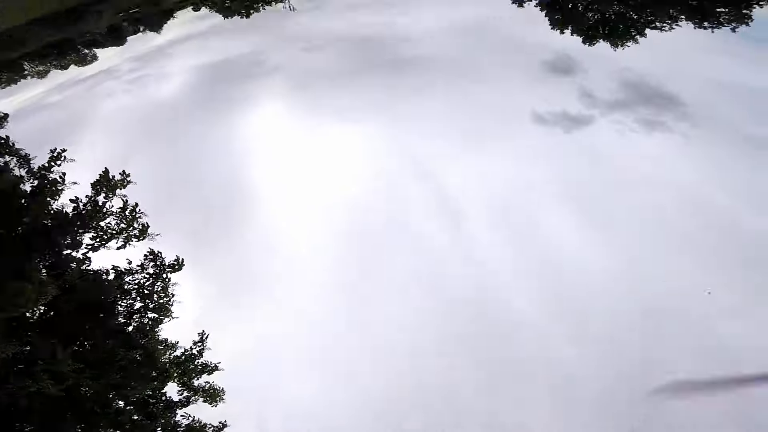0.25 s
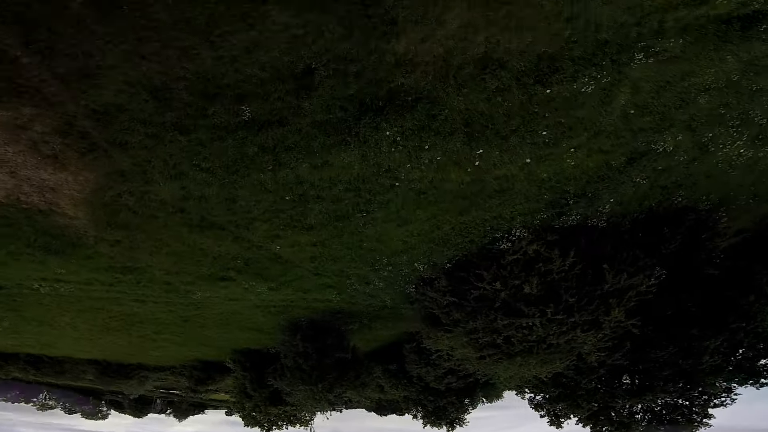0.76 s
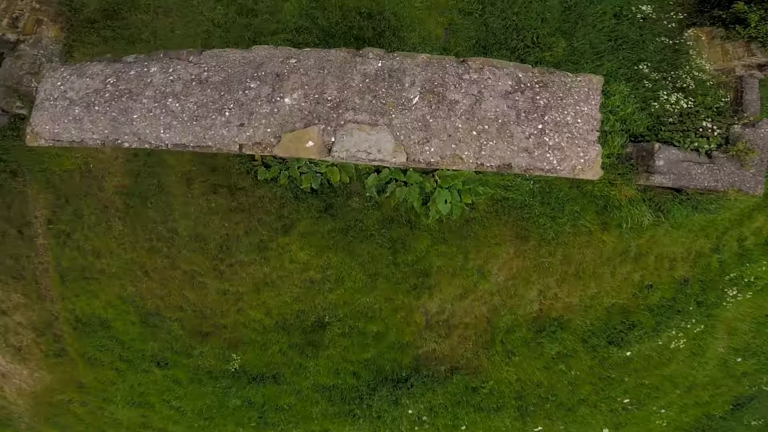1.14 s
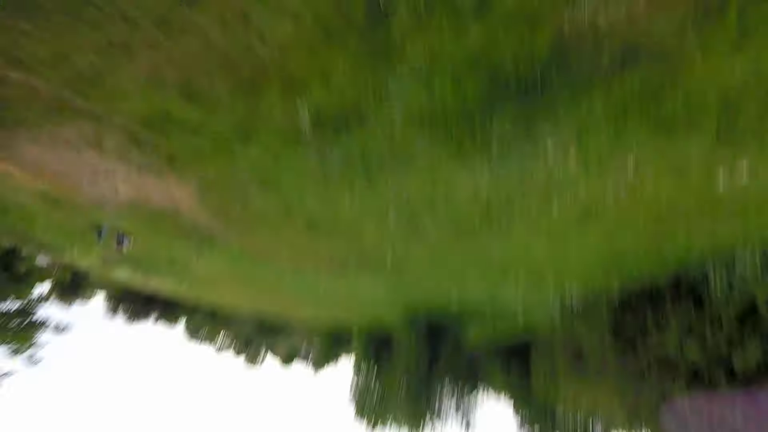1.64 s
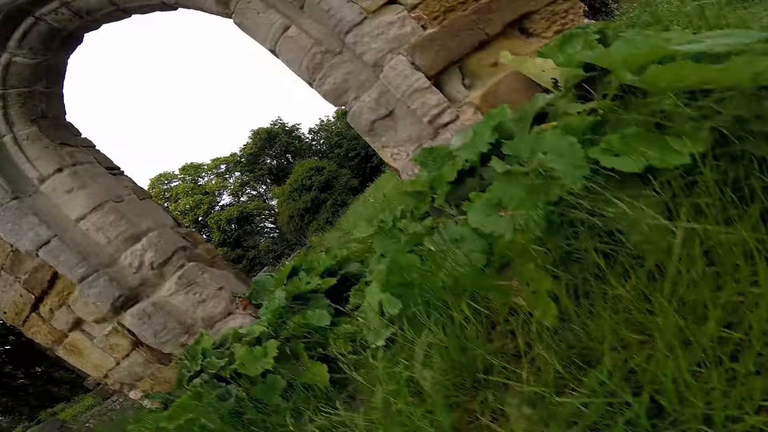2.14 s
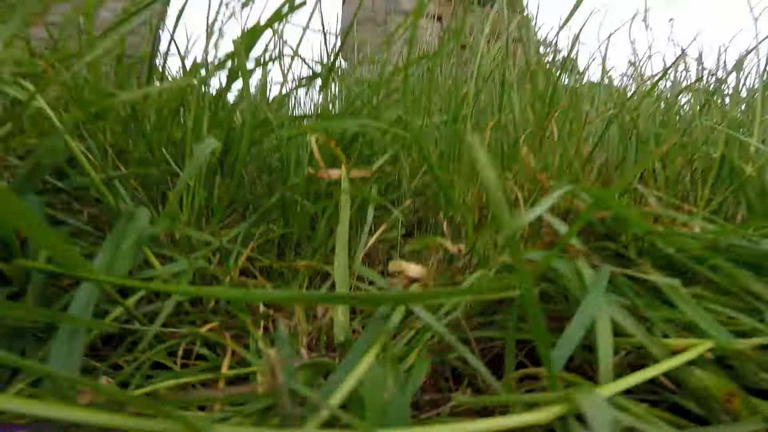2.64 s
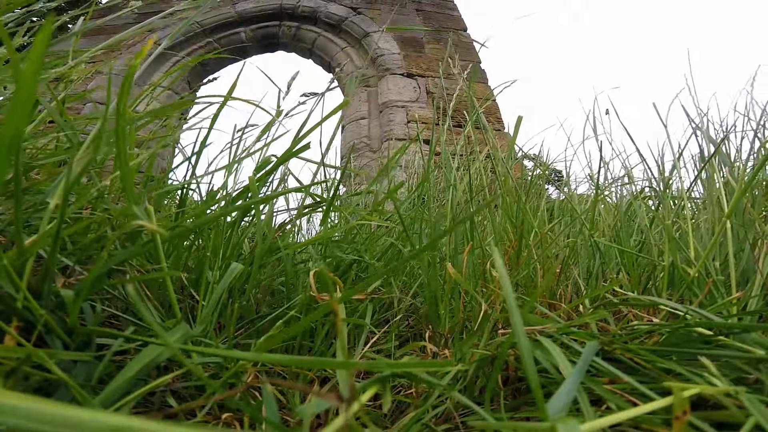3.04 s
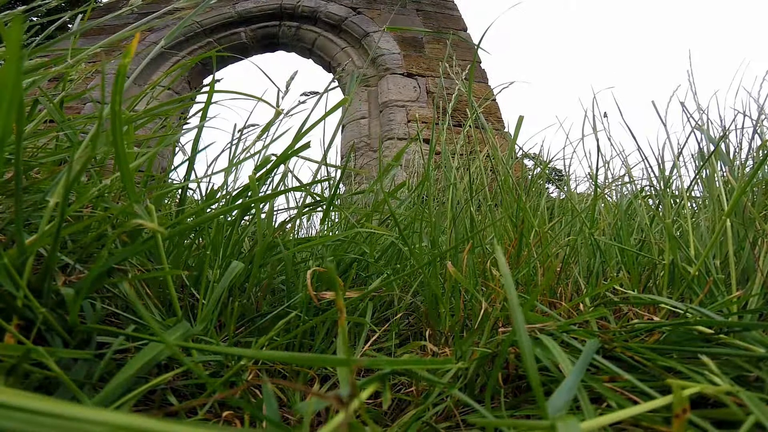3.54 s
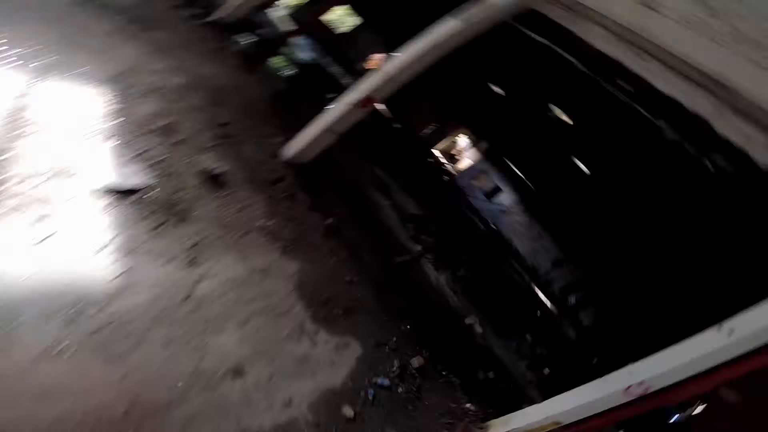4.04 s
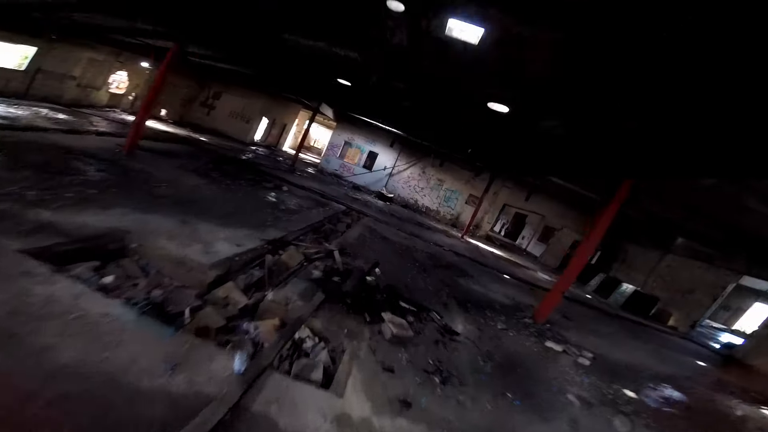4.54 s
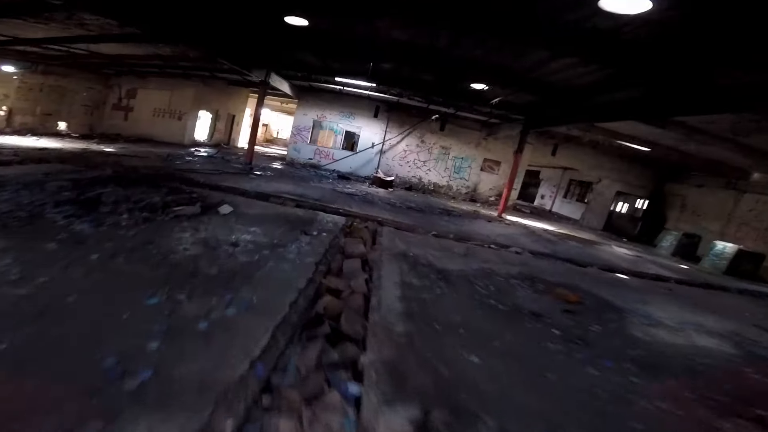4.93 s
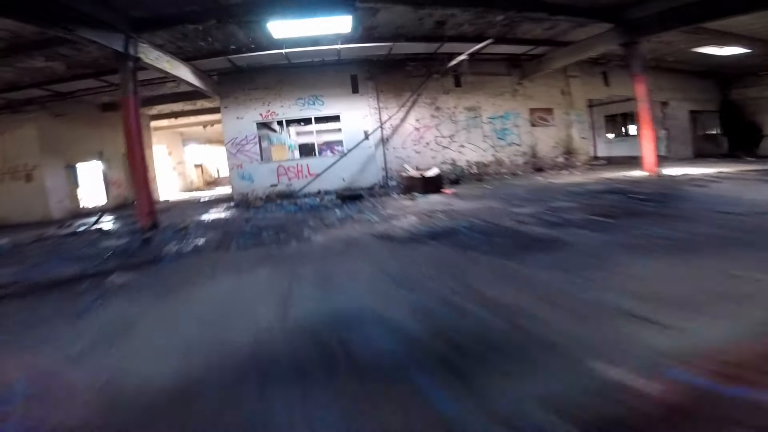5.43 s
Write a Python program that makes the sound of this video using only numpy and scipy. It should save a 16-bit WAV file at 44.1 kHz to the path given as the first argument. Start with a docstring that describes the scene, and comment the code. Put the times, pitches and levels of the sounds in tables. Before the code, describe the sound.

The microphone rides on a small racing quadcopter, so everything is close and raw. From 0 s a rough low propeller drone flutters with wind rumble, surging around 0.75 s, easing, then swelling again to 1.2 s with hissing prop wash. At about 1.4 s it hits a stone wall: hard thuds, a crack, short blade scrapes. The motors sag to a quieter churn, a small crack and sharp rev come at 1.65-1.8 s, then the pitch falls. At 2.2-2.4 s blades thrash into grass with dull knocks and choppy swish; the motors cut off, leaving faint ticks and near silence. At 3.61 s an abrupt cut starts an indoor flight: jabbing throttle bursts until 4 s, then a brighter buzzing cruise, its detuned motors beating and swaying, stepping up by 4.5 s, dipping near 5 s and climbing to the end, with shaft hum, buffeting and a short concrete echo.

```python
"""A rough propeller drone comes first: a racing quadcopter dives outdoors, heard from the camera on its frame.
It clips a stone wall, revs and tumbles into long grass; an abrupt cut then leads to a cruise in a concrete hall.
Sums of sines make the blade drone, the once-a-turn hum and the motor whine; all follow the motor speeds.
Shaped noise makes the hissing prop wash, buffeting air, scrapes and grass; struck resonances make the knocks."""
import sys
import numpy as np
from scipy import signal
from scipy.fft import rfft, irfft, next_fast_len
from scipy.io import wavfile
from scipy.ndimage import uniform_filter1d, minimum_filter1d

SR = 44100
rng = np.random.default_rng(int(sys.argv[2]) if len(sys.argv) > 2 else 0)


def transcribe(signal):
    """Save signal, clipped to [-1, 1], as a 16-bit WAV file at the path in sys.argv[1]."""
    frames = np.atleast_2d(signal).T
    limited = np.clip(frames, -1, 1)
    pcm = np.round(limited * 32767).astype(np.int16)
    wavfile.write(sys.argv[1], SR, pcm)


N = 250488
TIME = np.arange(N) / SR
CUT_S = 3.61  # from outdoors to the hall

# Throttle, as the rate at which blades pass: time_s, blade_rate_hz
FIELD_THROTTLE = [(0, 134.3), (.39, 119.7), (.47, 138.1), (.577, 186), (.736, 349.6), (.897, 241.2),
                  (1.0, 246.8), (1.21, 369.5), (1.384, 227.8), (1.5, 74.1), (1.666, 105.2), (1.811, 446.7),
                  (2.1, 121), (2.55, 99.76)]
HALL_THROTTLE = [(3.735, 430), (3.84, 340), (4, 325), (4.12, 345), (4.26, 442), (4.35, 432), (4.47, 569),
                 (4.535, 577), (4.71, 492), (4.8, 531), (4.89, 540), (4.98, 452), (5.04, 432), (5.12, 462),
                 (5.29, 600), (5.46, 613), (5.55, 652), (5.68, 608)]
# Outdoor speed compared with the throttle: motor_a_ratio, motor_b_ratio, motor_c_ratio
FIELD_TRIM = (0.93, 1.06, 0.97)
# Steering in the hall: time_s, b_to_a_ratio, c_to_a_ratio
HALL_STEERING = [(4, 1.17, 1), (4.33, 1.28, 1.14), (4.48, 1.19, 1.02), (4.7, 1.155, 1.13),
                 (4.92, 1.15, 1.13), (5.2, 1.12, 1.01), (5.34, 1.145, .92)]
# Stick jabs, with the blade rate each motor chases: start_s, length_s, push_a_hz, push_b_hz, push_c_hz
FIELD_JABS = [(-.097, 0.11, 331, 449.5, 340.5), (0.047, 0.065, -29, 40, 36),
              (0.111, .037, 61.5, -22.5, 5.5), (0.174, 0.054, 2, 19.5, -3.5),
              (0.264, 0.036, 62.5, -5.5, 29), (0.436, 0.037, 25, 86, 71), (0.48, .1, -51.5, 95.5, 20),
              (0.66, 0.27, 44, 120, 112.5), (1.171, .06, 199, 120, 148), (1.229, .05, 59, 260.5, 190),
              (1.291, .033, 900, 664, 536), (1.36, 0.032, 564.5, 779.5, 564.5),
              (1.422, 0.052, 206, 461, 378), (1.645, 0.081, 262.5, 760, 464),
              (1.694, .103, 954.5, 199, 643.5), (2.191, 0.092, 184, 305.5, 66),
              (2.283, 0.074, 403.5, 563, 339)]
HALL_JABS = [(3.577, .16, 395, 415.5, 370), (3.764, .026, 920, 852, 680), (3.802, .035, -1, 170.7, 19),
             (3.866, .038, 0, 329.2, 21), (3.939, .067, 0, 371, -0.5), (4, 0.036, 479.5, 260, 480)]
# Time constants with which motors chase a jab and lose it again
FIELD_SPIN_UP_S, FIELD_SPIN_DOWN_S = 0.0515, 0.0416
HALL_SPIN_UP_S, HALL_SPIN_DOWN_S = 0.022, 0.028
HOVER_HZ = 400  # blade rate
FULL_LOAD_OCTAVES_PER_S = 15  # a spin-up that draws the full current

# Balance of the four motors: blade_tone_db, imbalance_db, overtones_db, whine_db
FIELD_MOTORS = [(-1, -18, 1.5, 5), (-0.5, -19.5, -9, 0.5), (-8.5, -22, -10, 1), (-15.5, -23, -1.5, -2)]
HALL_MOTORS = [(1, -16, 7, -1), (-4.5, 0, 0, -3), (-3, -11, -4, 1), (-16, -20, 0, -6)]
# Blade tones: multiple_of_shaft_rate, relative_level_db
FIELD_ORDERS = [(2, -20.5), (3, 0), (4, -22.5), (5, -32), (6, -9), (9, -32.5), (12, -31), (15, -36.5),
                (18, -28), (21, -33.5)]
HALL_ORDERS = [(2, -33.5), (3, 4), (4, -19), (5, -15.5), (6, -14), (7, -41.5), (8, -31), (9, -27.5),
               (12, -33.5), (15, -36), (18, -39.5), (21, -50), (24, -46)]

# How each layer follows the motors: level_at_hover_db, change_per_octave_db, added_at_full_load_db
FIELD_DRONE_LAW = (-18.5, 3.5, 0.78)
FIELD_WASH_LAW = (-35.5, 12.6, 0.97)
FIELD_WHINE_LAW = (-51, 0.91, 8.6)
FIELD_WIND_LAW = (-20, 5, 1)
HALL_DRONE_LAW = (-25.5, 5.47, 1)
HALL_WASH_LAW = (-45.5, 10.04, 5)
HALL_WHINE_LAW = (-67, -11.5, 30)
WASH_TOP_OCTAVES = 0.49  # outdoors, speed above this adds no more wash

# Shaft hum in the hall: time_s, relative_level_db
HALL_HUM = [(3.62, -8.5), (3.98, -11.5), (4.13, -23), (4.26, -6.5), (4.45, -4.5), (4.48, -28.5), (4.5, -8),
            (4.58, -12.5), (4.81, -0.5), (5.01, -13), (5.12, -7.5), (5.19, -9), (5.21, -7.5), (5.68, -11)]
# Boom of the camera mount, and boost of the once-a-turn shaking outdoors
MOUNT_HZ, MOUNT_WIDTH_HZ, MOUNT_DB, SHAKE_DB = 204, 24, 8.5, 10
# Ring of the camera case
CASE_HZ, CASE_WIDTH_HZ, CASE_DB = 7700, 270, 13.5
# Slow blades turn this share of their drone power to noise; it shrinks as speed rises
IDLE_HZ, IDLE_CHURN, CHURN_CLEARS_HZ = 110, 0.27, 160
# Motors switched off in the grass
DISARM_S, DISARM_DB_PER_S = 2.414, 81

# Noise colours of bearings, prop wash and churning blades: pitch_hz, relative_level_db
BEARINGS = [(5000, -31), (6900, -16.5), (7250, 9), (7600, 16.5), (8000, -17.5), (10000, -36.5)]
FIELD_WASH = [(100, 5), (500, 16), (1200, 9), (2000, 6.5), (3200, -0.5), (4500, -4), (6000, -6.5),
              (7500, -6), (9000, -13), (11000, -24.5), (12500, -35.5), (15000, -40.5)]
HALL_WASH = [(100, 8.5), (600, 26), (1200, 15), (2000, 8), (3200, 2.5), (4800, -2.5), (6500, 1.5),
             (7800, -1), (9000, -17.5), (11000, -31.5), (14000, -43)]
CHURN = [(80, -9.5), (220, 8), (400, 4.5), (620, 4.5), (850, -5), (1300, -8.5), (2200, -29), (6000, -59.5)]

# Knocks on the frame, the one at 1.649 s a jolt as the motors restart: time_s, thud_relative_db, crack_db
KNOCKS = [(1.399, -8, -13), (1.419, -9, -39), (1.466, -31, -15), (1.649, -31, -26), (2.197, -14.5, -58),
          (2.262, 3, -22), (2.285, 0, -17), (2.359, -39, -23), (2.629, -36.5, -65), (2.714, -46, -71)]
# Ringing tones of the frame: pitch_hz, relative_level_db, time_to_fall_60_db_s
FRAME = [(75.6, 12, 0.057), (158, -0.5, 0.26), (261.6, -10, 0.054), (600, -5.5, 0.029), (1250, -8.5, 0.037)]
# Blades scraping the wall: start_s, length_s, level_db
SCRAPES = [(1.366, .036, -11), (1.432, 0.05, -18.5)]
# Blades in the grass, then settling stalks: start_s, length_s, swish_db, churn_db
GRASS_HITS = [(2.194, 0.049, -58.5, -35), (2.251, 0.12, -46, -19.5), (2.628, 0.158, -82, -64),
              (2.778, .055, -92, -72), (2.871, .055, -98, -72)]
# Noise colour of the grass: pitch_hz, relative_level_db
GRASS = [(500, -4), (2500, 0.5), (4200, -5), (6200, 11), (8000, 5), (10800, 5.5), (12000, -13),
         (14500, -15)]
# Time constants of a scrape or grass contact
CONTACT_ATTACK_S, CONTACT_RELEASE_S = 0.011, 0.0035

# Overall loudness outdoors, for the motors and partly the wind: time_s, level_db
FIELD_LOUDNESS = [(0, -4.5), (.4, -3.5), (.5, 1), (.75, 3), (1.05, 3), (1.2, 5), (1.4, 0.5), (1.52, -18),
                  (1.75, -8.5), (1.9, -19.5), (2.19, -14), (2.22, -10), (2.28, 1), (2.37, -12.5),
                  (2.58, -43), (2.68, -34), (2.85, -60), (3.1, -78), (3.55, -49)]
WIND_FOLLOWS = 0.62  # share of the loudness's dB swing applied to the wind
# Air buffeting the microphone in the hall: time_s, relative_level_db
HALL_BUFFET = [(3.62, -15), (3.87, -14.5), (3.94, -14.5), (4.04, -10.5), (4.07, -17.5), (4.19, -12.5),
               (4.2, -17), (4.46, -21.5), (4.48, -16), (4.97, -16), (5.29, -12.5), (5.68, -14)]
# Noise colours of buffeting and of still air: pitch_hz, relative_level_db
FIELD_WIND = [(20, -3.5), (45, 3), (90, 7), (140, 4.5), (220, -1.5), (400, -28.5), (800, -21.5),
              (1300, -35.5), (2200, -48), (6000, -69.5)]
HALL_WIND = [(20, -4), (40, 4), (80, 3.5), (150, 2.5), (260, -7), (420, -15), (800, -21.5), (2000, -35),
             (6000, -88)]
STILL_AIR = [(30, 32), (150, 25), (600, 19), (1500, 6.5), (4000, -1), (6500, 2), (9000, 2.5), (11000, -7.5),
             (15000, -18)]
STILL_AIR_DB = -88.5
HALL_T60, HALL_DB = 0.23, -23  # echo: seconds to fall 60 dB, and level


def motor_speeds(throttle, trims, jabs, up_s, down_s):
    """Blade rates of three motors: trimmed throttle plus jabs, which they chase and lose with a lag."""
    throttle_hz = in_time(throttle)[0]
    speeds = [trim * throttle_hz for trim in trims]
    for start, length, *pushes in jabs:
        response = swell(start, length, up_s, down_s)
        speeds = [hz + push * response for hz, push in zip(speeds, pushes)]
    return np.maximum(speeds, 30)


def shafts(speeds, hunting):
    """Blade rates and shaft angles of four motors; the fourth averages A and B, and all waver a little."""
    a, b, c = speeds
    rates, angles = [], []
    for hz in (a, b, c, (a + b) / 2):
        rate = uniform_filter1d(hz, size=600) * (1 + hunting * drift(30))
        turns = np.cumsum(rate) / (3 * SR)  # three blades pass in each turn
        rates.append(rate)
        angles.append(2 * np.pi * (turns + rng.random()))
    return rates, angles


def effort(speeds):
    """Typical speed in octaves above hover, and load: near 1 in a hard spin-up, negative when slowing."""
    octaves = uniform_filter1d(np.log2(np.median(speeds, axis=0) / HOVER_HZ), size=400)
    octaves_per_s = np.gradient(octaves) * SR
    load = np.tanh(octaves_per_s / FULL_LOAD_OCTAVES_PER_S)
    return octaves, np.maximum(load, -0.5)


def level_db(law, octaves, load):
    """A layer grows or fades with motor speed and load."""
    hover_db, octave_db, load_db = law
    return hover_db + octave_db * octaves + load_db * load


def propellers(rates, angles, motors, orders, flutter_db, bite_db):
    """Blades sound multiples of the shaft rate: speed brightens them, uneven inflow shakes each tone."""
    out, power = 0, 0
    for hz, angle, (tone_db, _, overtones_db, _) in zip(rates, angles, motors):
        octaves = np.clip(np.log2(hz / 600), -0.5, 0.6)
        for order, order_db in orders:
            bright_db = 0
            if order > 5:
                bright_db = overtones_db + bite_db * octaves * np.log2(order / 3)
            level = from_db(tone_db + order_db + bright_db + flutter_db * drift(25))
            out = out + level * np.sin(order * angle + rng.uniform(0, 2 * np.pi))
        power = power + from_db(tone_db) ** 2 / 2
    return out / np.sqrt(power)


def imbalance(angles, motors, flutter_db):
    """Unbalanced propellers shake the frame once a turn."""
    out = 0
    for angle, (_, shake_db, _, _) in zip(angles, motors):
        out = out + from_db(shake_db + flutter_db * drift(24)) * np.sin(angle)
    return np.sqrt(2) * out


def camera_mount(x):
    """The mount booms when a tone passes through its low resonance."""
    b, a = signal.iirpeak(MOUNT_HZ, MOUNT_HZ / MOUNT_WIDTH_HZ, fs=SR)
    return x + from_db(MOUNT_DB) * signal.lfilter(b, a, x)


def whine(rates, angles, motors, commutation_db, cogging_db, bearings_db):
    """Twelve slots and fourteen poles: 42 commutations and 84 cogging steps a turn, over hissing bearings."""
    out = 0
    for hz, angle, (_, _, _, whine_db) in zip(rates, angles, motors):
        for steps, db in ((42, commutation_db), (84, cogging_db)):
            pitch_hz = hz * steps / 3
            through_case = 1 / (1 + (pitch_hz / 7800) ** 24)  # high tones are blocked
            level = from_db(db + whine_db + 2 * drift(60))
            out = out + through_case * level * np.sin(steps * angle)
    bearings = from_db(bearings_db) * rms_one(noise(BEARINGS, 5000, 10000))
    return camera_case(out) + bearings


def camera_case(x):
    """The case adds a narrow treble resonance."""
    b, a = signal.iirpeak(CASE_HZ, CASE_HZ / CASE_WIDTH_HZ, fs=SR)
    return x + from_db(CASE_DB) * signal.lfilter(b, a, x)


def wash(angles, spectrum, chop, flutter_db):
    """Blade-tip hiss, pulsing as each blade passes an arm."""
    passes = sum(np.cos(3 * angle) for angle in angles) / 2
    pulses = np.exp(chop * passes) * from_db(flutter_db * drift(40))
    return noise(spectrum, 2000, 6000) * rms_one(pulses)


def knocks(crack_t60):
    """Each knock sets the frame ringing and gives a short noisy crack."""
    pushes, cracks = np.zeros(N), np.zeros(N)
    for s, thud_db, crack_db in KNOCKS:
        at = round(s * SR)
        pushes[at] = from_db(thud_db)
        cracks[at:] += from_db(crack_db - 60 * TIME[:N - at] / crack_t60)
    thuds = sum(from_db(db - 12.5) * ring(pushes, hz, t60) for hz, db, t60 in FRAME)
    return thuds + cracks * rms_one(noise(FIELD_WASH, 2000, 6000))


def contacts(rows):
    """Rubbing grows while a contact lasts, then dies away; all contacts add up."""
    out = 0
    for start, length, db in rows:
        out = out + from_db(db) * swell(start, length, CONTACT_ATTACK_S, CONTACT_RELEASE_S)
    return out


def grass(lash_db):
    """Stalks lash the blades in quick uneven strokes, heard as swish and churn noise."""
    lashes = rms_one(from_db(lash_db * drift(200)))
    hits = np.array(GRASS_HITS)
    swish = contacts(hits[:, :3]) * noise(GRASS, 2000, 6000)
    churn = contacts(hits[:, [0, 1, 3]]) * noise(CHURN, 200, 1400)
    return lashes * (swish + churn)


def buffeting(spectrum, top_hz, wind_db):
    """Air pushing on the microphone makes a low, gusty noise."""
    return noise(spectrum, 25, top_hz) * from_db(wind_db)


def hall_echo(x):
    """Bare concrete returns a diffuse, fading tail, duller than the source."""
    tail = rng.standard_normal(N) * from_db(-60 * TIME / HALL_T60)
    tail *= TIME > 0.012  # the first echo takes time to return
    tail /= np.sqrt(np.sum(tail ** 2))
    dull = signal.sosfilt(signal.butter(1, [300, 4000], "band", fs=SR, output="sos"), x)
    return signal.fftconvolve(dull, tail)[:N]


def still_air():
    """A steady, very faint noise lies under the outdoor flight."""
    return from_db(STILL_AIR_DB) * noise(STILL_AIR, 2000, 6000)


def from_db(db):
    """Decibels to gain."""
    return 10 ** (np.asarray(db) / 20)


def rms_one(x):
    """Scale to an rms (average strength) of 1."""
    return x / np.sqrt(np.mean(x ** 2) + 1e-20)


def in_time(rows):
    """Each column after the time becomes a curve over all samples."""
    s, *columns = np.transpose(rows)
    return [np.interp(TIME, s, column) for column in columns]


def drift(rate):
    """Random wandering of rms 1: chance values, 2 * rate a second, joined by lines."""
    steps = rng.standard_normal(8192)
    return rms_one(np.interp(TIME * 2 * rate, np.arange(len(steps)), steps))


def swell(start, length, up_s, down_s):
    """Rises towards 1 while an event lasts, then dies away."""
    since = TIME - start
    rise = 1 - np.exp(-np.clip(since, 0, length) / up_s)
    return rise * np.exp(-np.clip((since - length) / down_s, 0, 50))


def noise(spectrum, low, high):
    """Random noise of a given colour, whose part between two frequencies has rms about 1."""
    size = next_fast_len(N)
    hz = np.maximum(np.fft.rfftfreq(size, 1 / SR), 1)
    points_hz, points_db = np.transpose(spectrum)
    gain = from_db(np.interp(np.log(hz), np.log(points_hz), points_db)) * (hz > 10)
    in_band = (hz > low) & (hz < high)
    gain /= np.sqrt(np.mean(gain ** 2 * in_band))
    return irfft(rfft(rng.standard_normal(size)) * gain, size)[:N]


def ring(x, hz, t60):
    """A resonance: a click of height 1 sets off a fading sine that starts at about height 1."""
    r, w = from_db(-60 / (t60 * SR)), 2 * np.pi * hz / SR
    return signal.lfilter([0, np.sin(w)], [1, -2 * r * np.cos(w), r * r], x + 1e-18)


def field_flight():
    """The dive, the wall, the last rev and the tumble: motor sounds, contacts and moving air."""
    speeds = motor_speeds(FIELD_THROTTLE, FIELD_TRIM, FIELD_JABS, FIELD_SPIN_UP_S, FIELD_SPIN_DOWN_S)
    rates, angles = shafts(speeds, hunting=0.003)
    octaves, load = effort(speeds)
    loudness_db = in_time(FIELD_LOUDNESS)[0]
    running = from_db(loudness_db - DISARM_DB_PER_S * np.maximum(TIME - DISARM_S, 0))

    tones = propellers(rates, angles, FIELD_MOTORS, FIELD_ORDERS, flutter_db=2.5, bite_db=6)
    shake = from_db(SHAKE_DB) * imbalance(angles, FIELD_MOTORS, flutter_db=4)
    churn = noise(CHURN, 200, 1400)
    fouled = IDLE_CHURN * np.exp((IDLE_HZ - speeds.mean(axis=0)) / CHURN_CLEARS_HZ)
    fouled = np.clip(fouled, 0, 1)
    blend = np.sqrt(1 - fouled) * camera_mount(tones + shake) + np.sqrt(fouled) * churn
    drone = from_db(level_db(FIELD_DRONE_LAW, octaves, load)) * blend

    motors = whine(rates, angles, FIELD_MOTORS, commutation_db=-6.5, cogging_db=-4.5, bearings_db=-11.5)
    motors = from_db(level_db(FIELD_WHINE_LAW, octaves, load)) * motors
    wash_db = level_db(FIELD_WASH_LAW, np.minimum(octaves, WASH_TOP_OCTAVES), load)
    hiss = from_db(wash_db) * wash(angles, FIELD_WASH, chop=0.2, flutter_db=2.53)

    collisions = contacts(SCRAPES) * churn + grass(lash_db=3.5) + knocks(crack_t60=0.017)
    wind_db = level_db(FIELD_WIND_LAW, octaves, load) + WIND_FOLLOWS * loudness_db + 1.5 * drift(20)
    wind = buffeting(FIELD_WIND, 140, wind_db)
    return running * (drone + hiss + motors) + collisions + wind + still_air()


def hall_flight():
    """Throttle punches, then a swaying cruise: motor sounds, strong shaft hum, buffeting and echo."""
    trims = [1, *in_time(HALL_STEERING)]
    speeds = motor_speeds(HALL_THROTTLE, trims, HALL_JABS, HALL_SPIN_UP_S, HALL_SPIN_DOWN_S)
    rates, angles = shafts(speeds, hunting=0.002)
    octaves, load = effort(speeds)

    tones = propellers(rates, angles, HALL_MOTORS, HALL_ORDERS, flutter_db=2.35, bite_db=6)
    drone = from_db(level_db(HALL_DRONE_LAW, octaves, load)) * tones
    hum = from_db(in_time(HALL_HUM)[0] - 2.5) * imbalance(angles, HALL_MOTORS, flutter_db=0.83)
    motors = whine(rates, angles, HALL_MOTORS, commutation_db=-1, cogging_db=-13, bearings_db=-12.5)
    motors = from_db(level_db(HALL_WHINE_LAW, octaves, load)) * motors
    hiss = wash(angles, HALL_WASH, chop=0.34, flutter_db=0.72)
    hiss = from_db(level_db(HALL_WASH_LAW, octaves, load)) * hiss
    wind = buffeting(HALL_WIND, 120, in_time(HALL_BUFFET)[0] - 4 + drift(22))
    echo = from_db(HALL_DB) * hall_echo(drone + hiss)
    return drone + hum + motors + hiss + wind + echo


def scene():
    """The outdoor flight gives way to the hall flight within 2 ms."""
    indoors = np.interp(TIME, [CUT_S, CUT_S + 0.002], [0, 1])
    return ((1 - indoors) * field_flight() + indoors * hall_flight())[None]


def record(dry):
    """A fast limiter turns loud peaks down, then a steep filter removes the top of the treble."""
    room_left = np.minimum(1, 0.96 / (np.abs(dry) + 1e-9))
    gain = uniform_filter1d(minimum_filter1d(room_left, size=220), size=220)
    treble_cut = signal.cheby2(12, 60, 16000, fs=SR, output="sos")  # 60 dB down from 16 kHz up
    return signal.sosfilt(treble_cut, dry * gain)


dry = scene()
out = record(dry)
transcribe(out)
```